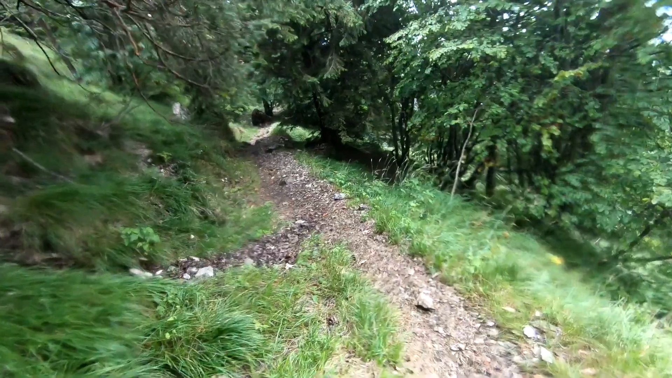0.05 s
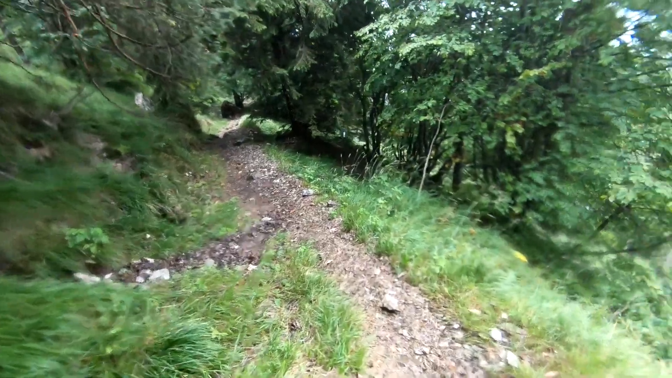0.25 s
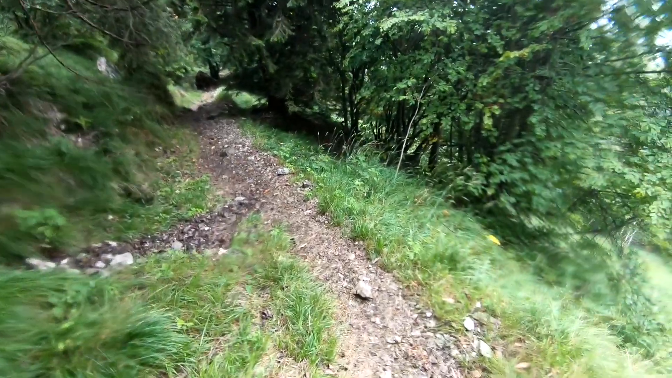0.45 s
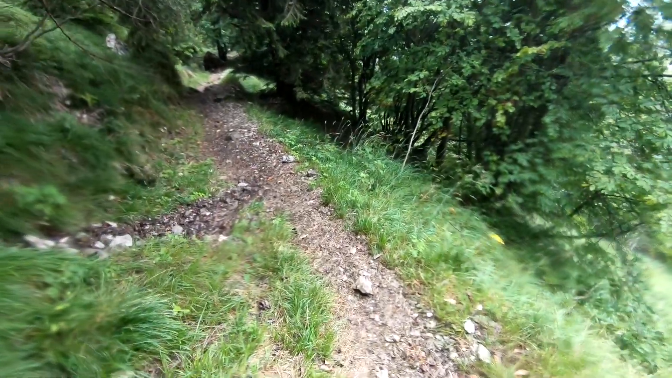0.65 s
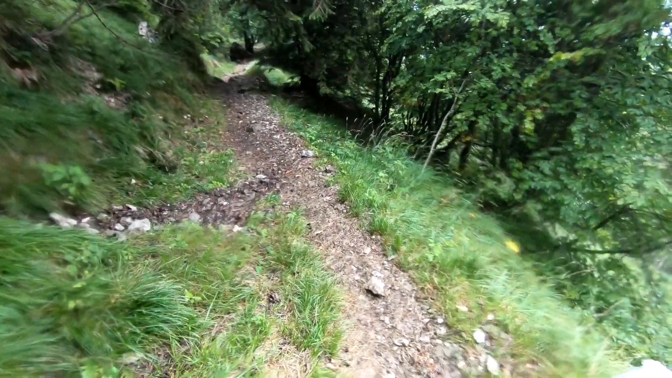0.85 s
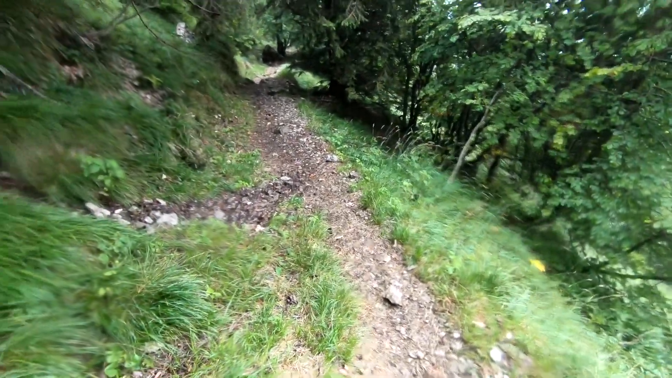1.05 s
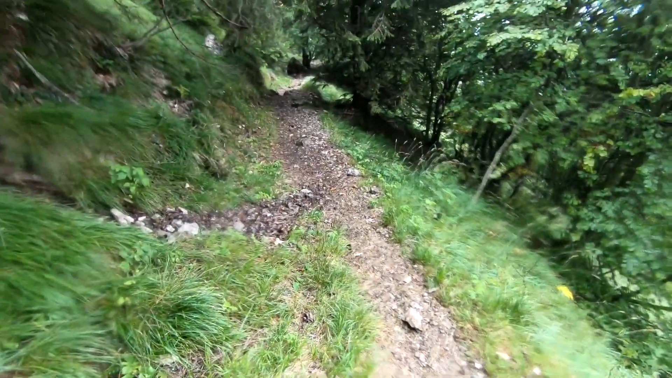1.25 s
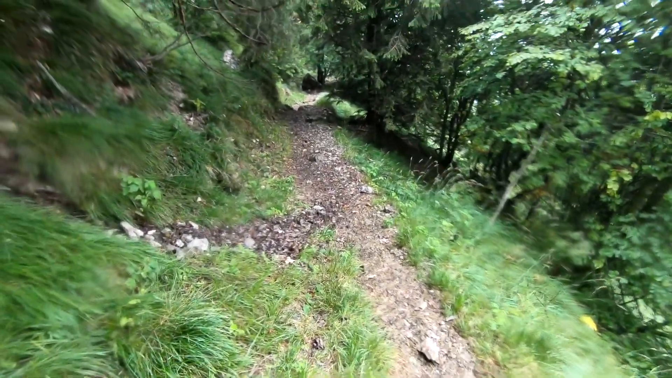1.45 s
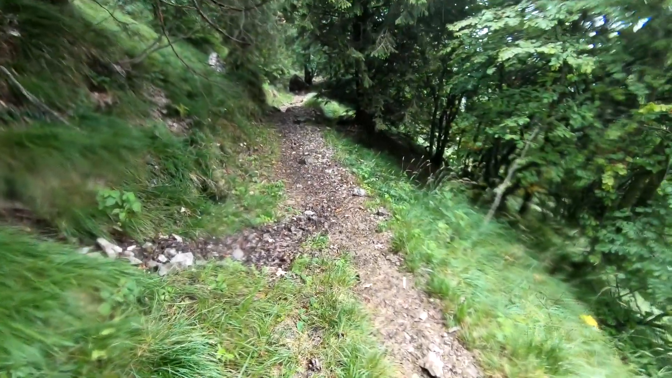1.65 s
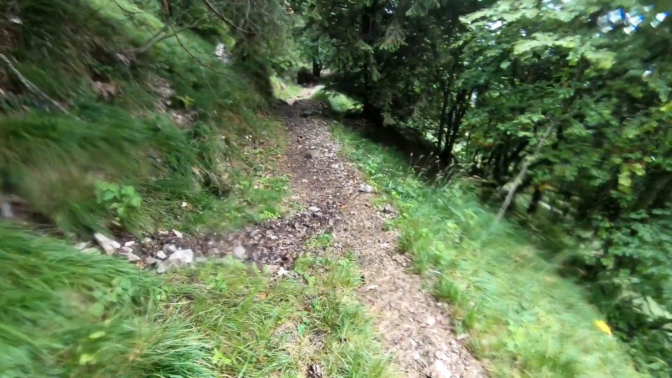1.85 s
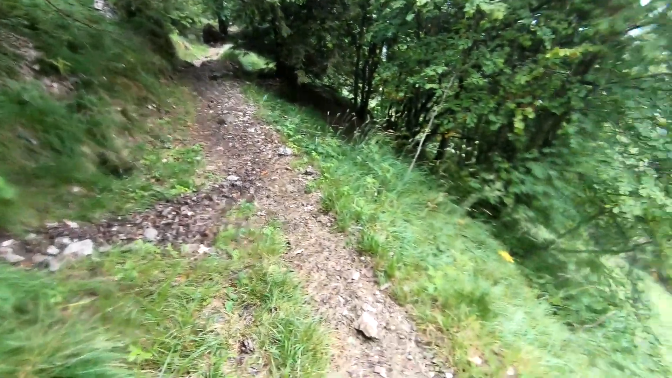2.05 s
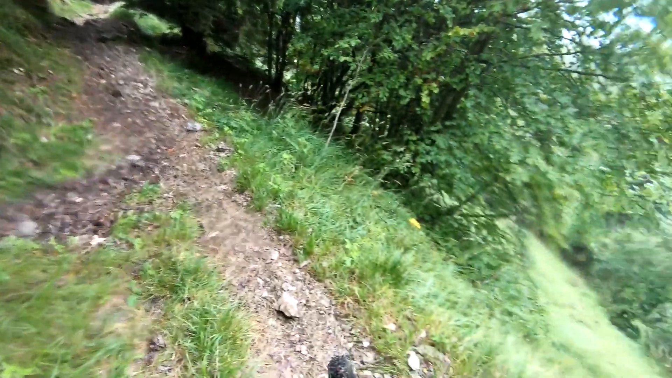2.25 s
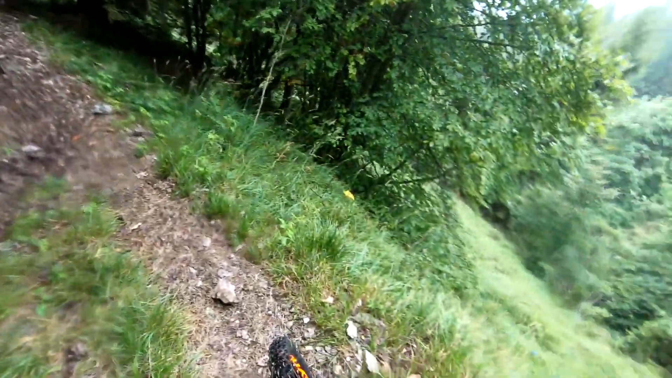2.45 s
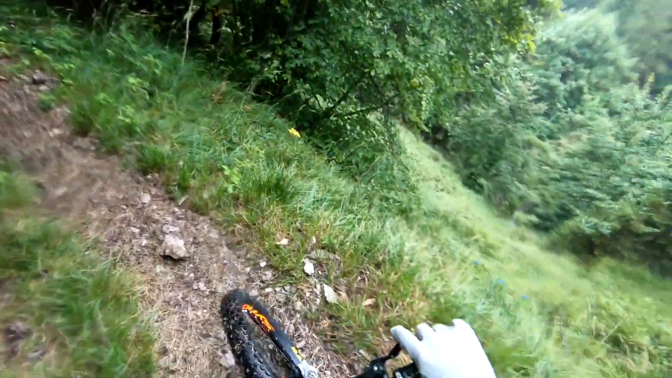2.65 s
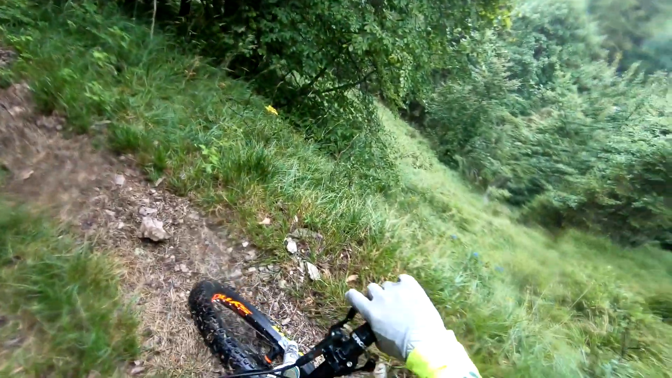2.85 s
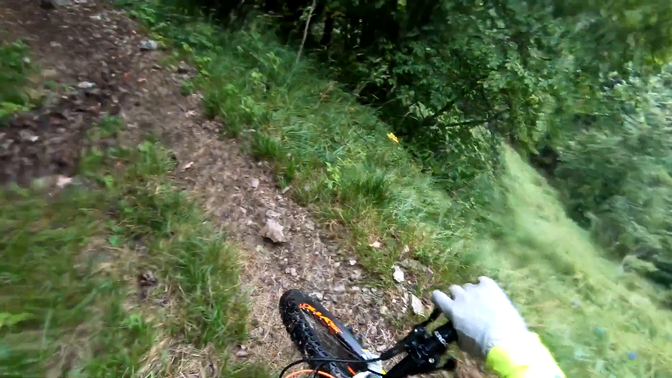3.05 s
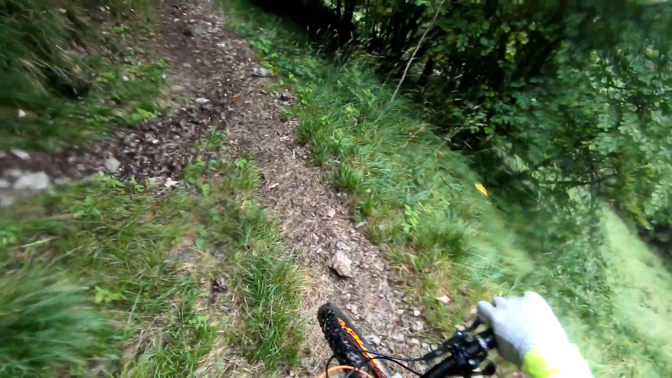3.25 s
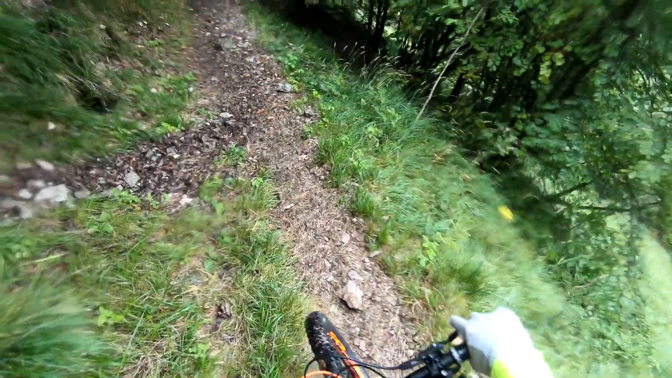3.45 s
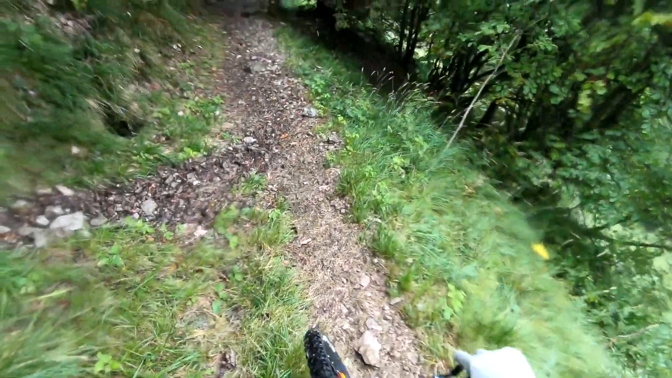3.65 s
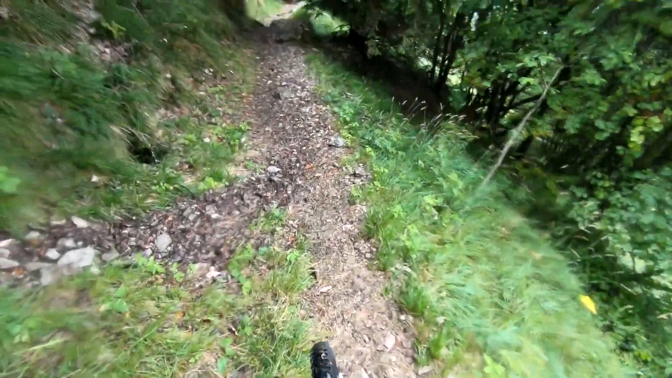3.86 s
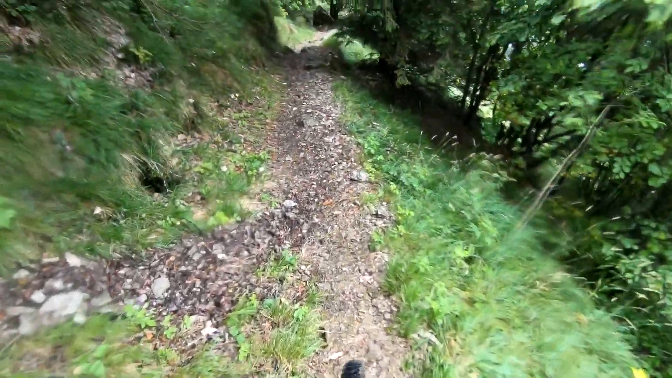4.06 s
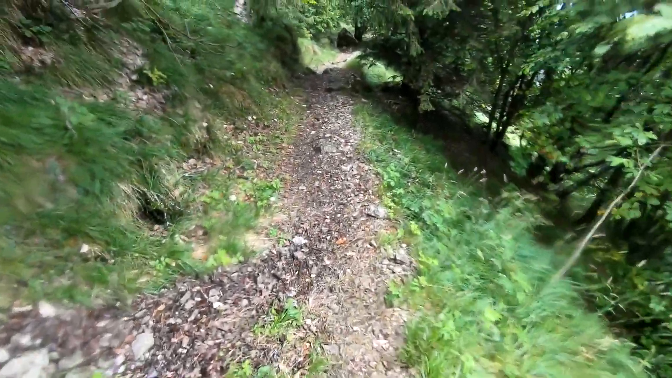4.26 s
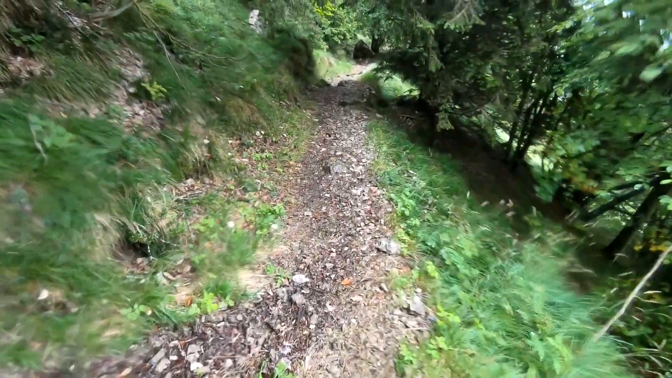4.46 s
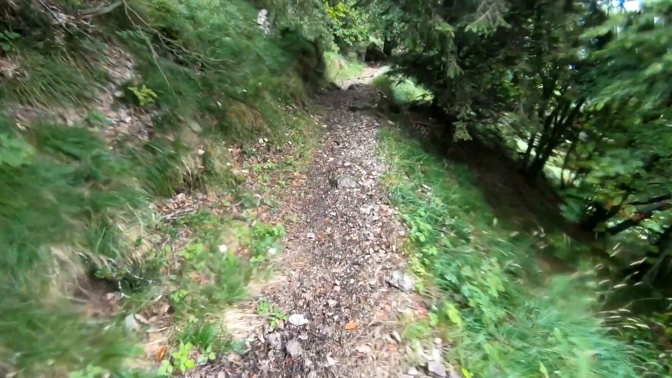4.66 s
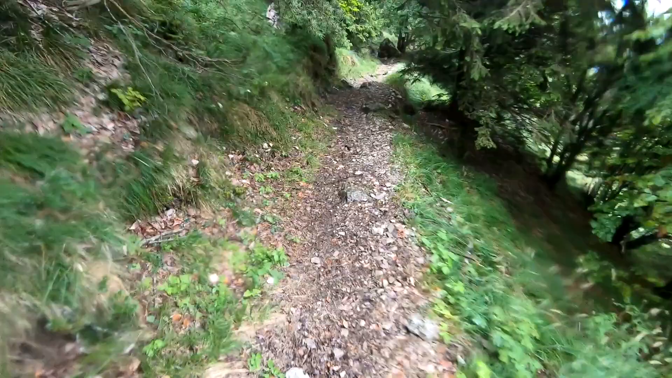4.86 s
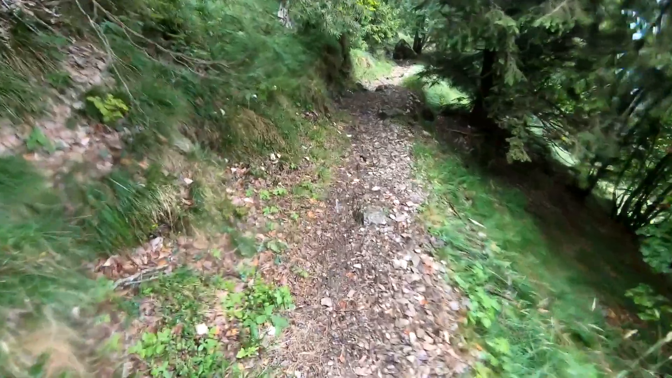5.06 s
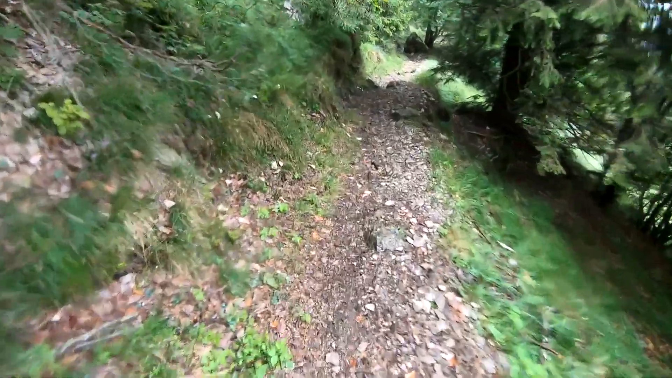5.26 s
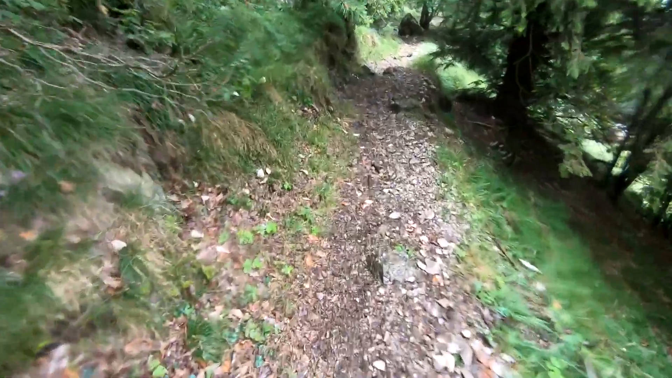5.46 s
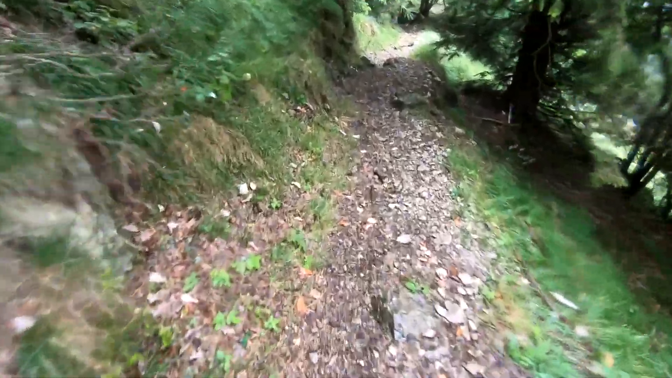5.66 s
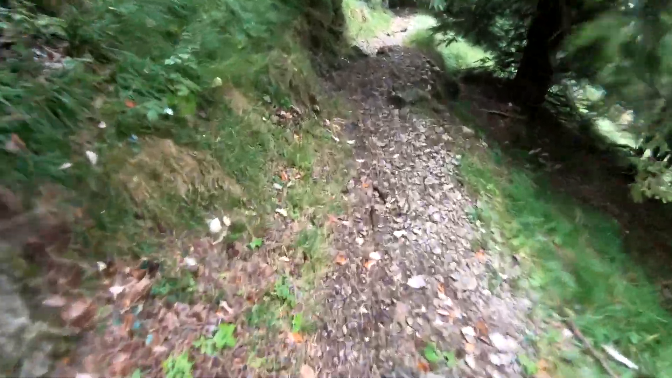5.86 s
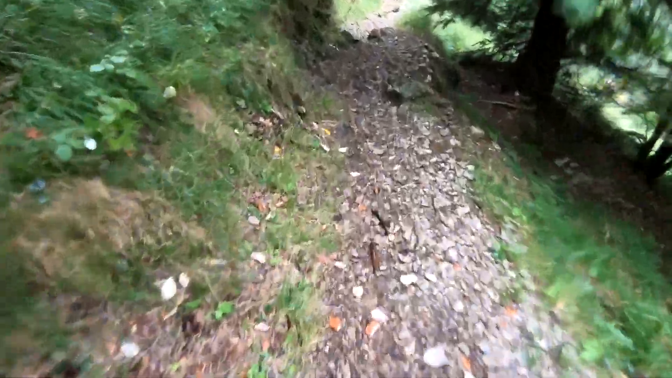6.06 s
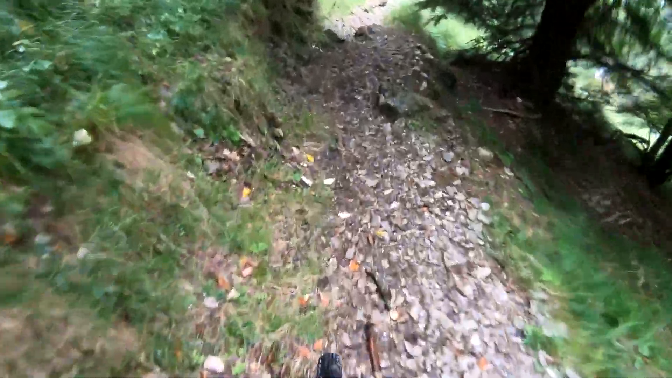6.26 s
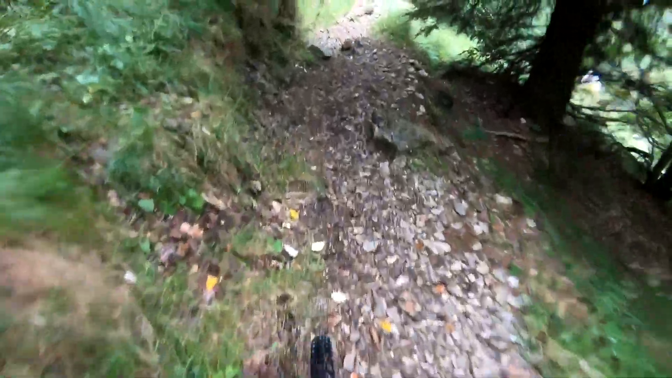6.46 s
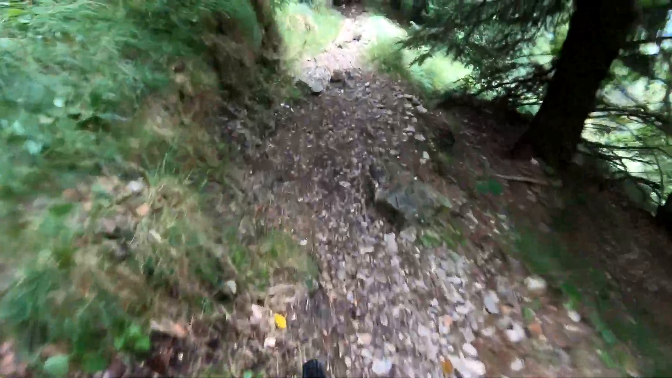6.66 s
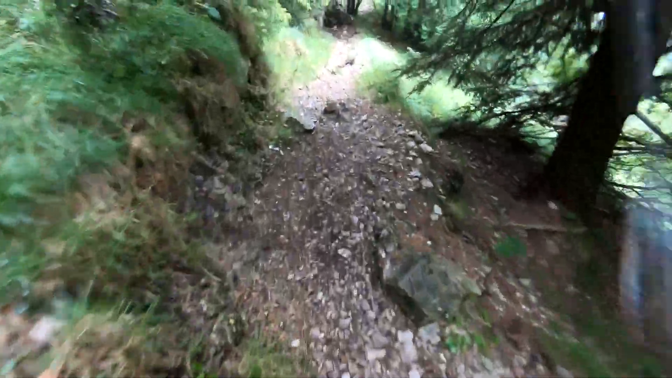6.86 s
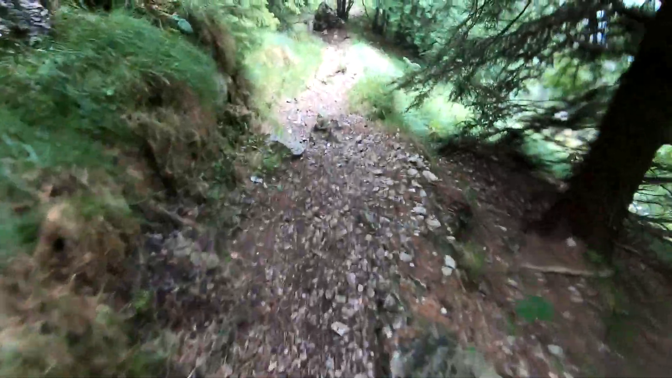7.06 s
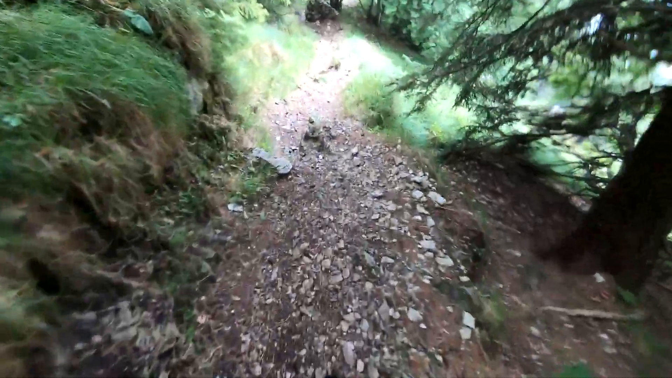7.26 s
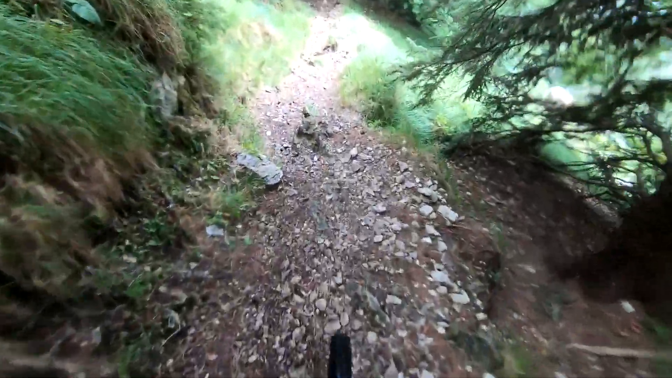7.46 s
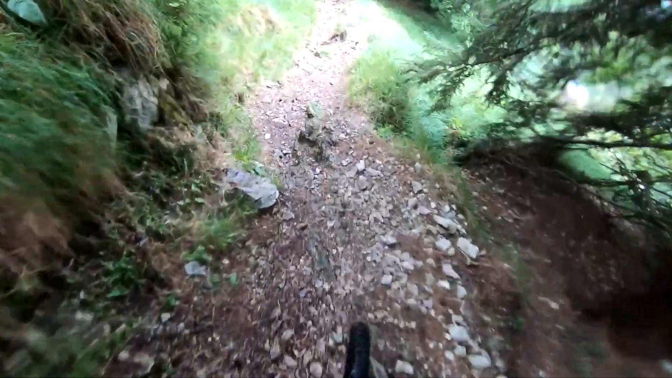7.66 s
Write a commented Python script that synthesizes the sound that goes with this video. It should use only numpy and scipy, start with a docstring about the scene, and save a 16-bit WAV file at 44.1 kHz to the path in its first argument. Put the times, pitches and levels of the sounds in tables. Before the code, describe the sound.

Rider's-eye sound of a bike on loose gravel: low wind buffeting, fine tyre grit, plastic ticking, sharp stone cracks and hollow thumps.

```python
"""Wind rumbles and tyres hiss: a mountain bike rolls down a stony trail, heard from the rider's camera.
The wind, shaped noise with single gusts, calms and later returns; tiny random impacts make the tyres' grit.
The camera mount ticks with short rings, and bumps make the housing knock and boom.
Loose patches crunch in clusters of contacts; stones snap away with a ring, a crack and a bright snap.
Too much treble makes the camera's gain control duck for a moment."""
import sys
import numpy as np
from scipy import signal
from scipy.fft import rfft, irfft, next_fast_len
from scipy.io import wavfile
from scipy.ndimage import uniform_filter1d, minimum_filter1d, map_coordinates

SR = 44100
rng = np.random.default_rng(int(sys.argv[2]) if len(sys.argv) > 2 else 0)


def materialize(psi):
    """Save the field psi as 16-bit PCM at rate SR to the path in sys.argv[1].

    A 1-D psi becomes a single channel; in a 2-D psi each row is a channel.
    """
    bounded = np.clip(np.atleast_2d(psi).T, -1, 1)
    quanta = np.round(bounded * 32767).astype(np.int16)
    wavfile.write(sys.argv[1], SR, quanta)


N = 340176


def amp(db):
    """Turn decibels into a gain."""
    return 10 ** (np.asarray(db) / 20)


def unit(x):
    """Scale to an average strength (rms) of 1."""
    return x / np.sqrt(np.mean(x ** 2) + 1e-20)


def burst(x, span):
    """Scale a short sound so that its energy equals rms 1 over span seconds."""
    energy = np.mean(np.sum(x ** 2, axis=-1))
    return x * np.sqrt(span * SR / (energy + 1e-20))


def along(points, hz):
    """Read (f/Hz, value) points between the rows, on a log frequency axis."""
    f, v = np.transpose(points)
    return np.interp(np.log(hz + 1), np.log(f + 1), v)


def curves(rows):
    """Draw straight lines through each column after the time, one value per sample."""
    s, *cols = np.transpose(rows)
    return [np.interp(np.arange(N) / SR, s, c) for c in cols]


def wobble(rate):
    """A smooth random curve through `rate` random points a second."""
    points = rng.standard_normal(int(N * rate / SR) + 4)
    return map_coordinates(points, [np.arange(N) * rate / SR])


def filtered(x, response):
    """Multiply the spectrum of x by a response that depends on frequency."""
    n = x.shape[-1]
    m = next_fast_len(n + 8192)  # spare room keeps the end from wrapping onto the start
    return irfft(rfft(x, m) * response(np.fft.rfftfreq(m, 1 / SR)), m)[..., :n]


def coloured(x, colour):
    """Give a steady sound a spectrum, at rms 1."""
    return unit(filtered(x, lambda hz: amp(along(colour, hz))))


def struck(x, colour, size=4096):
    """Give a blow a spectrum so that nothing sounds before it (a minimum-phase filter)."""
    cepstrum = irfft(np.log(amp(along(colour, np.fft.rfftfreq(size, 1 / SR)))))
    # folding the second half onto the first moves all the response after the blow
    cepstrum[1:size // 2] *= 2
    cepstrum[size // 2 + 1:] = 0
    return irfft(rfft(x, size) * np.exp(rfft(cepstrum)), size)


def sides(pan_db):
    """Left and right gains of mean power 1; positive is louder on the left."""
    return unit(amp(np.array([[pan_db], [-pan_db]]) / 2))


# how sound through the housing moves the two microphone ports against each other:
# f/Hz, right port's lead/radians at a share of 1
HOUSING_PHASE = [(100, 1.06), (700, 2.484), (1400, 2.517), (2200, 1.75), (4000, 0.52), (7000, 1.9),
                 (12500, .2)]


def ports(x, share):
    """Turn left against right by a share of the housing's phase difference."""
    def turn(hz):
        return np.exp(.5j * share * along(HOUSING_PHASE, hz) * np.array([[-1], [1]]))
    return filtered(x, turn)


def add(track, s, sound):
    """Mix a sound into a track from time s, in seconds."""
    part = track[..., max(round(s * SR), 0):][..., :sound.shape[-1]]
    part += sound[..., :part.shape[-1]]


def grains(rate, spread_db, channels=1):
    """Random tiny impacts, rate a second; a positive spread makes a few much larger, a negative one smaller."""
    hit = rng.random((channels, N)) < rate / SR
    size_db = spread_db * np.minimum(rng.exponential(size=(channels, N)), 4)
    return unit(hit * amp(size_db) * rng.choice([-1, 1], (channels, N)))


def ringing(modes, t):
    """Add dying tones, each with a new random strength and slight detuning at every blow."""
    total = 0
    for hz, db, t60 in modes:
        fade = amp(db + rng.normal(0, 3.1) - 60 * t / t60)
        total = total + fade * np.sin(2 * np.pi * hz * (1 + rng.normal(0, 0.015)) * t)
    return total


# wind on the ports, before wind() adds its offsets: t/s, slow buffeting level/dB, eddies level/dB
WIND_LEVELS = [(0, -27.5, -37), (0.3, -33.5, -49), (0.45, -49.5, -50), (0.98, -61.5, -53.5),
               (1.15, -46, -46.5), (1.75, -54.5, -47), (2.1, -55, -55), (2.75, -52, -50),
               (3.05, -55.5, -52), (3.5, -46, -50), (3.9, -51, -54), (4.15, -33.5, -47.5), (4.5, -35, -36),
               (4.95, -33.5, -40), (5.3, -29, -28), (5.7, -34, -36), (6.1, -37, -33.5), (6.3, -33.5, -32.5),
               (6.62, -28, -27.5), (7.0, -29.5, -34.5), (7.3, -27.5, -33), (7.71, -35.5, -42)]
# relative spectra of slow buffeting, faster eddies and airy rush: f/Hz, level/dB per Hz
BUFFET_SPECTRUM = [(8, 0.5), (22, 1.5), (35, -1.5), (55, -15), (85, -21.5), (150, -29.5), (400, -102)]
EDDY_SPECTRUM = [(45, -8), (80, -1.5), (120, -1), (180, -5.5), (260, -14.5), (450, -36.5), (1200, -82)]
RUSH_SPECTRUM = [(120, -17), (260, 3.5), (380, -2), (550, -10.5), (900, -18), (2000, -25), (5000, -102)]
STEADY_DB, RUSH_OFFSET_DB = -39, -16  # reference in the eddies column; rush minus that column there
RUSH_GROWS = 0.94  # dB of rush per dB of eddies
GUSTY_DB, SWELLS_PER_S = 2.5, 12  # chance swells of the buffeting


def wind():
    """Turbulence comes in lumps, differs at each port and is stronger on the windward right."""
    buffet_db, eddies_db = curves(WIND_LEVELS)
    rush_db = STEADY_DB + RUSH_OFFSET_DB + RUSH_GROWS * (eddies_db - STEADY_DB)
    lumps = wobble(24)

    def air(colour, lumpy_db):
        noise = coloured(rng.standard_normal((2, N)), colour)
        return unit(noise * amp(lumpy_db * lumps))

    buffet_gain = amp(buffet_db + GUSTY_DB * wobble(SWELLS_PER_S) + 6.0)
    buffet = buffet_gain * sides(-12.5) * air(BUFFET_SPECTRUM, lumpy_db=2.5)
    eddies = amp(eddies_db - 3.5) * sides(-5.0) * air(EDDY_SPECTRUM, lumpy_db=2.0)
    rush = amp(rush_db) * sides(-8) * air(RUSH_SPECTRUM, lumpy_db=4.0)
    return buffet + eddies + rush


# tyres on the trail: t/s, rolling level/dB
ROLLING_LEVEL = [(0, -56.5), (0.42, -58.5), (0.9, -56.5), (1.75, -55), (2.6, -57), (3.2, -55), (4.1, -55),
                 (5.3, -55), (5.75, -57), (5.88, -54.5), (6.1, -62.5), (6.65, -59), (7.71, -57.7)]
# relative spectra of crushed grit and smooth hiss: f/Hz, level/dB per Hz
GRIT_SPECTRUM = [(250, -8), (500, -4), (700, -1.5), (950, -2), (1300, 0.5), (1800, 0), (2300, -0.5),
                 (3100, 0.5), (3900, -7), (5000, -12.5), (8000, -37), (16000, -62)]
HISS_SPECTRUM = [(2000, -17.5), (3500, -9.5), (5000, -4), (6000, 1.5), (7000, 3), (7700, 1), (8400, -6),
                 (10000, -10), (11500, -15.5), (13000, -18), (15500, -23), (16200, -41)]
GRIT_DB, HISS_DB = 0.22, 0.24  # each relative to the rolling level


def tyres():
    """Knobs crush fine grit: dense grains over a smooth hiss."""
    rolling_db, = curves(ROLLING_LEVEL)
    shared = ports(grains(rate=900, spread_db=-1.5), share=0.57)
    apart = 0.4 * grains(rate=1800, spread_db=3.0, channels=2) + 0.89 * rng.standard_normal((2, N))
    grit = coloured(0.83 * shared + apart, GRIT_SPECTRUM) * amp(1.2 * wobble(25)) * sides(-1.6)
    fizz = rng.standard_normal((2, N)) + 0.18 * grains(rate=1200, spread_db=11, channels=2)
    hiss = coloured(fizz, HISS_SPECTRUM) * amp(0.28 * wobble(9.8)) * sides(-1.9)
    return amp(rolling_db) * (amp(GRIT_DB) * grit + amp(HISS_DB) * hiss)


# the loudest ticks of the mount in its joint: t/s, level/dB
LOUD_TICKS = [(0.036, -33), (0.091, -32), (0.129, -31), (0.569, -36), (1.478, -29), (1.586, -33),
              (1.61, -31), (1.685, -21.5), (1.734, -31), (1.928, -28.5), (1.957, -31.5), (2.042, -33),
              (3.081, -34), (3.216, -25.5), (3.751, -34), (3.831, -28), (4.137, -33), (4.21, -27),
              (5.348, -29), (5.44, -30)]
# typical level of the faint ticking, which eases once the bike runs: t/s, level/dB
FAINT_TICK_LEVEL = [(0, -36), (4.2, -43.5), (4.7, -47.5), (7.71, -48)]
# relative spectrum of a dull clack, also used for stones: f/Hz, level/dB per Hz
CLACK_SPECTRUM = [(100, -17.5), (250, 3), (520, -3), (1000, 3), (1800, 5), (2400, -11), (4000, -52.5),
                  (16000, -69)]
TICK_HZ, TICK_SPREAD_HZ = 1222, 66
TICK_GAP_S, TICK_SCATTER_S, TICK_SPREAD_DB = 0.058, 0.014, 2.5  # pace and spread of the faint ticks


def mount_ticks(count=135):
    """The plastic joint slips and rings for a few cycles; faint slips follow at an uneven pace."""
    out, t = np.zeros(N), np.arange(SR // 20) / SR
    shift, size = rng.standard_normal((count, 2)).T
    times = TICK_GAP_S * np.arange(count) + TICK_SCATTER_S * shift
    faint_db = np.interp(times, *np.transpose(FAINT_TICK_LEVEL)) + TICK_SPREAD_DB * size
    for s, db in [*LOUD_TICKS, *np.column_stack([times, faint_db])]:
        hz = TICK_HZ + TICK_SPREAD_HZ * rng.normal()
        ring = np.sin(2 * np.pi * hz * t) + 0.47 * rng.normal() * np.sin(2 * np.pi * 700 * t)
        clack = struck(0.79 * rng.standard_normal(len(t)), CLACK_SPECTRUM)[:len(t)]
        envelope = (1 - np.exp(-t / 0.00031)) * amp(-60 * t / 0.018)
        add(out, s, amp(db) * burst((ring + clack) * envelope, 0.002))
    return ports(out, share=1.127)


# single gusts that push on the ports: t/s at the middle, level/dB, half length/s
SINGLE_GUSTS = [(0.115, -27, 0.031), (0.237, -20, 0.026), (0.298, -21, 0.031), (1.343, -29.5, 0.016),
                (1.479, -28.5, 0.0062), (1.926, -42, .02), (2.508, -45, 0.012), (2.666, -43.5, 0.041),
                (3.218, -28, 0.04), (3.49, -35.5, 0.033), (4.061, -23.5, 0.023), (4.229, -26, 0.045),
                (4.858, -26, 0.015), (5.233, -23, 0.021), (5.51, -18.5, .025), (6.276, -23.5, .03),
                (6.768, -27.5, 0.034)]
# relative spectrum of a gust: f/Hz, level/dB per Hz
GUST_SPECTRUM = [(10, -18), (28, 2.5), (55, -4.5), (85, -11), (150, -24), (400, -56), (1500, -120)]


def gusts(size=16384):
    """One large eddy passes: slow swings of pressure swell and fade."""
    out, t = np.zeros((2, N)), np.arange(size) / SR
    for s, db, half in SINGLE_GUSTS:
        start = max(s - size / SR / 2, 0)
        swell = np.exp(-((start + t - s) / half) ** 2)
        push = coloured(rng.standard_normal((2, size)), GUST_SPECTRUM) * swell
        add(out, start, amp(db) * burst(push * sides(-14.5), 1.37 * half))
    return out


# tyres knocking over stones (short) and grinding through loose patches (long):
# t/s, body level/dB, body f/Hz, edge level/dB, length/s
CRUNCH_EVENTS = [(0.25, -49, 596, -56, 0.012), (1.212, -40, 1050, -64, 0.007),
                 (1.265, -57, 630, -54, 0.029), (1.438, -49.5, 740, -58, 0.0064),
                 (2.199, -38.5, 537, -65, 0.013), (2.909, -52, 684, -52, 0.02),
                 (3.16, -44.5, 1820, -42, 0.013), (3.199, -34.5, 830, -43.5, 0.0093),
                 (3.216, -51, 596, -60, 0.028), (3.448, -43.5, 620, -48.5, 0.021),
                 (3.488, -43, 635, -55, 0.04), (3.539, -50, 650, -56, 0.046),
                 (4.054, -41, 754, -57, 0.0064), (4.318, -42.5, 513, -51, 0.015),
                 (4.471, -32.5, 1020, -67, 0.0049), (4.498, -36.5, 785, -42, 0.01),
                 (5.004, -34, 880, -63, 0.0045), (5.291, -24, 1400, -47, 0.0031),
                 (5.298, -41.5, 746, -49, 0.026), (5.472, -39.5, 785, -56, 0.015),
                 (5.494, -35, 725, -42.5, 0.015), (5.887, -38, 850, -38.5, 0.027),
                 (6.069, -53, 743, -58, 0.052), (6.356, -48, 1170, -56.5, 0.035),
                 (6.613, -32.5, 1620, -45, 0.0036), (6.625, -49, 1800, -58, 0.018),
                 (6.763, -48, 920, -52.5, 0.011), (7.049, -39.5, 1070, -66, 0.0098)]
# relative spectra of the dull body and the bright edge: f/Hz, level/dB per Hz
CRUNCH_SPECTRUM = [(150, -14), (350, 6.5), (700, 11), (1200, 5.5), (1800, -1), (2600, -12), (5000, -10),
                   (16000, -80)]
EDGE_SPECTRUM = [(1200, -37), (2400, 12.5), (3300, 12), (4600, 5), (7200, 6), (9000, -9), (12000, -52),
                 (16000, -64)]
CASING_HZ, CASING_DB = 334, -4  # the tyre casing's hollow note, relative to the body level


def crunches():
    """Several stones grind together: a quick cluster of contacts with a hollow tone of its own."""
    out, t = np.zeros(N), np.arange(4096) / SR
    for s, body_db, body_hz, edge_db, length in CRUNCH_EVENTS:
        swell = t / length * np.exp(-3 * t / length)
        hits = rng.random(len(t)) < 1400 / SR  # about 1400 a second
        contacts = swell * rng.standard_normal(len(t)) * (0.37 + hits)
        dull = struck(contacts, CRUNCH_SPECTRUM)

        def hollow(hz, q):
            return burst(signal.lfilter(*signal.iirpeak(hz, q, fs=SR), dull), length)

        body = 0.59 * hollow(body_hz, q=3.5) + 0.5 * burst(dull, length)
        body = body + amp(CASING_DB) * hollow(CASING_HZ, q=4.2)
        edge = burst(struck(contacts, EDGE_SPECTRUM), 0.39 * length)
        add(out, s, amp(body_db) * body + amp(edge_db) * edge)
    return ports(out, share=0.7) * sides(-7.5)


# bumps that reach the camera; a sharper jolt knocks higher:
# t/s, boom level/dB, knock level/dB, knock pitch ratio
BUMP_EVENTS = [(0.266, -30.5, -37, 1.28), (0.315, -22, -38.5, 1.13), (1.49, -35, -38.5, 1.06),
               (1.756, -31.5, -22, .7), (2.004, -63, -36, 0.96), (2.204, -8.5, -23, 1.35),
               (2.34, -57, -35.5, 0.95), (3.204, -33, -30.5, 1.1), (3.749, -35, -38, 0.93),
               (4.056, -28, -51, 0.86), (4.321, -13, -24.5, 1.01), (4.504, -19, -25.5, 0.92),
               (4.819, -20, -48, 1), (5.08, -24, -31.5, .8), (5.293, -21, -26, .85),
               (5.9, -8.5, -13.5, 0.89), (6.94, -19.5, -30.5, 1.2), (6.983, -22, -34, 0.9)]
# the housing's tones after a jolt, at pitch ratio 1: f/Hz, level/dB, time to fade by 60 dB/s
HOUSING_MODES = [(239.6, -4.5, 0.046), (305, -3.5, 0.033), (447, -5, 0.011), (672, -8.5, 0.0064)]
BOOM_HZ = 118.7  # the mount's note
# a boom more than HARD_DB above its knock sounds lower, by about 1 % per further dB
HARD_DB, SAG_PER_DB = 14, 0.01


def bumps():
    """A jolt knocks the housing, which then booms on its mount, mostly into the right port."""
    out, t = np.zeros(N), np.arange(SR // 4) / SR
    for s, boom_db, knock_db, pitch in BUMP_EVENTS:
        sag = SAG_PER_DB * max(boom_db - knock_db - HARD_DB, 0)
        boom_hz = BOOM_HZ * np.exp(0.01 * rng.normal() - sag)
        boom = np.sin(2 * np.pi * boom_hz * t) * (1 - np.exp(-t / 0.0051)) ** 2 * amp(-60 * t / 0.11)
        knock = ringing(HOUSING_MODES, pitch * t) * (1 - np.exp(-t / 0.0014))
        add(out, s, amp(boom_db) * burst(boom, 0.014) + amp(knock_db) * burst(knock, 0.012))
    return out * np.array([[-.22], [1]])  # the left moves the opposite way


PEBBLE_DB, PEBBLE_SPREAD_DB = 6.5, 5  # typical crack level over the rolling level; its spread
PEBBLE_HZ = 1160  # typical ring


def pebbles(count=14):
    """Small stones flung at random, louder with the rolling; rows like those of STONE_EVENTS."""
    times = rng.uniform(0, N / SR, count)
    size, pitch, side = rng.standard_normal((count, 3)).T
    db = np.interp(times, *np.transpose(ROLLING_LEVEL)) + PEBBLE_DB + PEBBLE_SPREAD_DB * size
    ring_hz = PEBBLE_HZ * np.exp(0.2 * pitch)
    return np.column_stack([times, db + 2.5, ring_hz, db, db + 1.5, 5 * side])


# stones snapping from the tyres and striking the bike:
# t/s, ring level/dB, ring f/Hz, crack level/dB, snap level/dB, left over right level/dB (of the snap)
STONE_EVENTS = [(0.5164, -53, 1760, -33.5, -38, 3), (0.8199, -39, 1300, -40.5, -39, -13),
                (1.164, -26.5, 1800, -34.5, -31.5, 25), (1.3902, -38, 1240, -43, -59, 3),
                (1.4906, -30, 1610, -64, -58, 1), (1.6853, -45, 1320, -37, -41, 2),
                (1.7559, -22.5, 1300, -27, -21, -5), (2.0035, -21, 1720, -30.5, -34, 14),
                (2.3389, -33.5, 1290, -30.5, -24.5, -7), (2.92, -42.5, 1210, -44, -48, -5),
                (2.983, -36, 1117, -42, -45, 2), (3.1036, -50, 1030, -42, -40, 3),
                (3.7224, -24, 1560, -32, -30, 26), (3.9676, -35.5, 1500, -30, -31.5, 15),
                (5.1666, -33.5, 1320, -31.5, -40, -18), (5.497, -28.5, 1240, -48, -39, -13),
                (5.9, -20.5, 1750, -13.5, -17, -8), (5.9075, -18.5, 1740, -26, -29, 11),
                (6.8902, -28, 840, -35, -34, -19)]
# what a struck stone sets ringing: f/Hz, level/dB, time to fade by 60 dB/s
STONE_MODES = [(2394, -5, 0.0078), (2580, -9, 0.012), (3046, -10, 0.018), (4170, -22.5, 0.017)]
# relative spectra of crack, snap and splintering: f/Hz, level/dB per Hz
CRACK_SPECTRUM = [(1200, 7.5), (2000, 10), (2600, 6), (3400, 1.5), (4200, -7), (6500, -13), (16000, -75)]
SNAP_SPECTRUM = [(3500, -29), (5200, -6), (6600, 2.5), (7800, 4), (8700, -9), (12000, -23), (15000, -23),
                 (17000, -47)]
SPLINTER_SPECTRUM = [(2000, -35), (5000, -12), (8000, 7.5), (9700, 0), (11500, -7), (14000, -7),
                     (15500, -9), (16500, -28)]
CONTACT_S, CRUSH_S = 0.00055, 0.018  # contact time of a light strike; what a crack at 0 dB adds to it


def stones():
    """A stone lets go within milliseconds: a ringing crack, a bright snap and a short dull ring."""
    out, t = np.zeros((2, N)), np.arange(4096) / SR
    for s, ring_db, ring_hz, crack_db, snap_db, pan_db in [*STONE_EVENTS, *pebbles()]:
        life = CONTACT_S + CRUSH_S * amp(crack_db)  # a harder strike presses for longer
        force = np.exp(-(2 * t / life - 1) ** 2) + 0.53 * np.exp(-t / 0.0017)
        click = 2.93 * signal.unit_impulse(len(t), round(life * SR / 2))

        def contact():
            return force * rng.standard_normal(len(t)) + click

        ring = burst(np.sin(2 * np.pi * ring_hz * t) * amp(-60 * t / 0.013), 0.0052)
        clack = burst(struck(contact(), CLACK_SPECTRUM), 0.0029)
        body = burst(1.4 * ring + clack, 0.0023)
        tones = burst(ringing(STONE_MODES, t), 0.0016)
        crack = burst(tones + 0.61 * burst(struck(contact(), CRACK_SPECTRUM), 0.0057), 0.0024)
        snap = burst(struck(np.array([contact(), contact()]), SNAP_SPECTRUM), 0.00078)
        # splintering reaches far into the treble and grows faster than the crack
        splinter = burst(struck(contact(), SPLINTER_SPECTRUM), 0.0032) * sides(4.5)
        sound = amp(ring_db) * body + amp(crack_db) * crack * sides(0.28 * pan_db)
        sound = sound + amp(snap_db) * snap * sides(pan_db) + amp(1.25 * crack_db - 9.5) * splinter
        add(out, s, sound)
    return ports(out, share=0.94)


def scene():
    """Everything as it reaches the two ports."""
    return wind() + tyres() + mount_ticks() + gusts() + crunches() + bumps() + stones()


def gain_control(x):
    """An overload in the treble pulls the gain down; it holds for a moment and comes back."""
    treble = filtered(x, lambda hz: hz > 2000)
    power = uniform_filter1d(np.mean(treble ** 2, axis=0), size=130)  # averaged over about 3 ms
    level_db = 10 * np.log10(np.abs(power) + 1e-12)
    overload = np.clip((level_db + 20) / 2, 0, 1)  # starts at -20 dB, full at -18 dB
    hold = int(.08 * SR)
    held = -minimum_filter1d(-overload, 2 * (hold // 2) + 1, origin=hold // 2)
    t = np.arange(SR // 2) / SR
    lag = t * np.exp(-t / .015)  # the gain moves smoothly, not at once
    return x * amp(-14 * signal.fftconvolve(held, lag / lag.sum())[:N])


TOP_HZ = 16100  # nothing passes above this


def record(dry):
    """The camera's gain control, its soft overload on loud peaks, and its band limit."""
    x = gain_control(dry)
    x = x / (1 + np.abs(x / .9) ** 6) ** (1 / 6)  # peaks bend towards 0.9
    return filtered(x, lambda hz: hz < TOP_HZ)


dry = scene()
out = record(dry)
materialize(out)
```